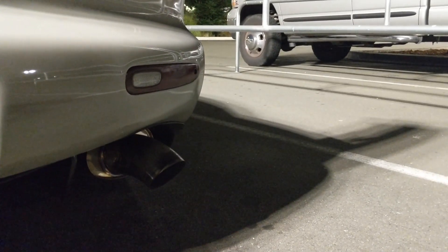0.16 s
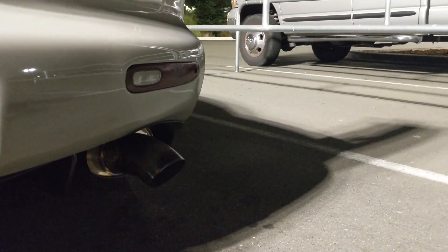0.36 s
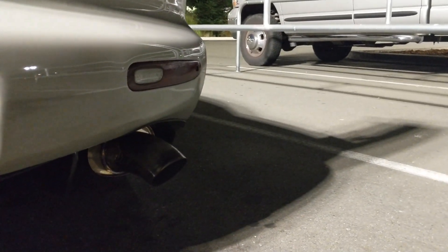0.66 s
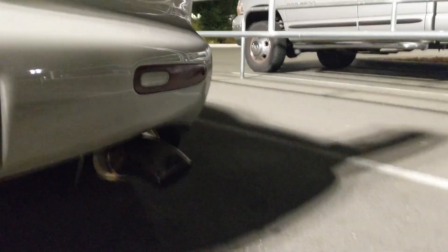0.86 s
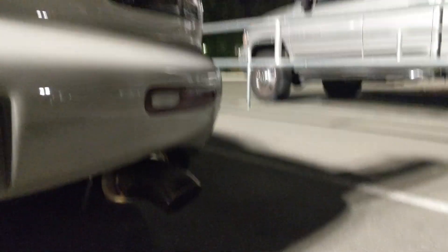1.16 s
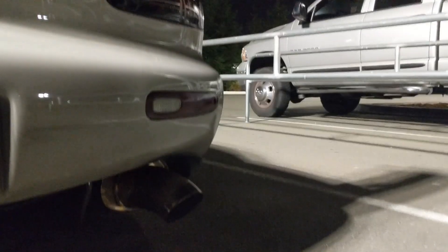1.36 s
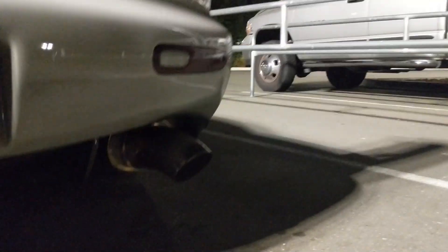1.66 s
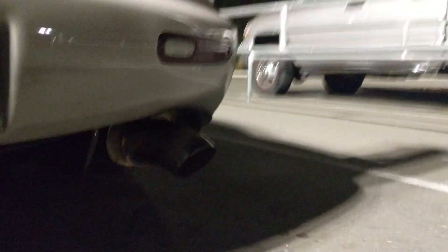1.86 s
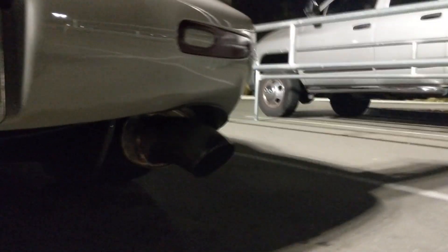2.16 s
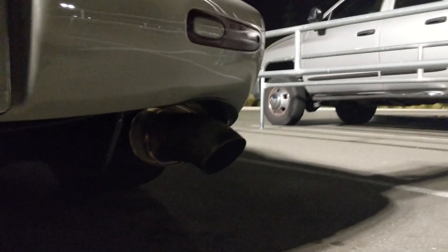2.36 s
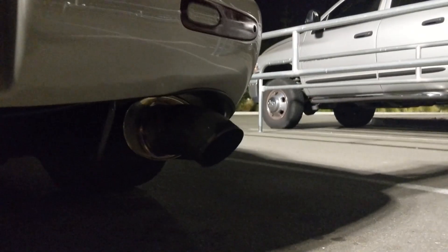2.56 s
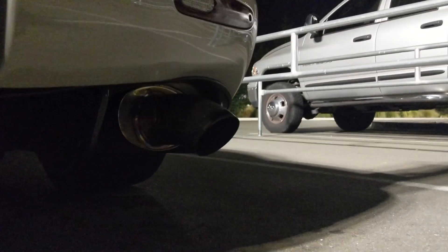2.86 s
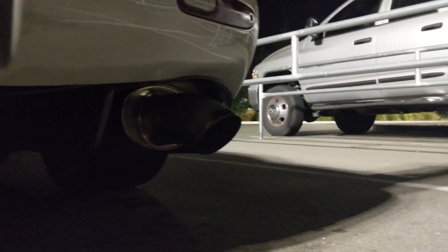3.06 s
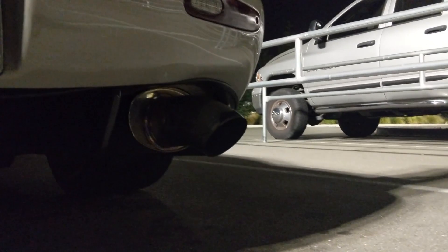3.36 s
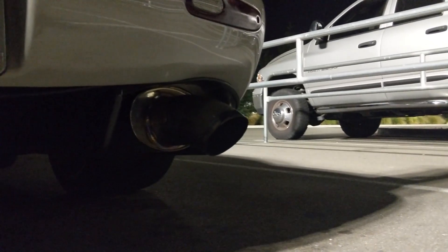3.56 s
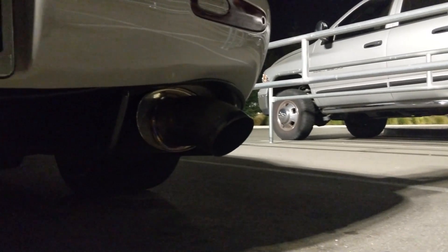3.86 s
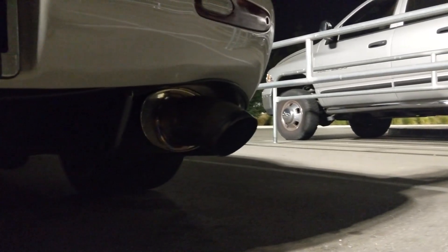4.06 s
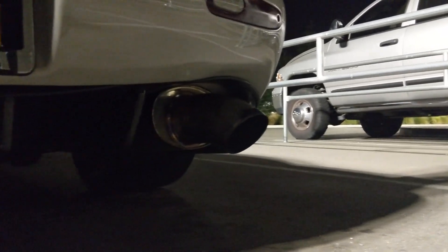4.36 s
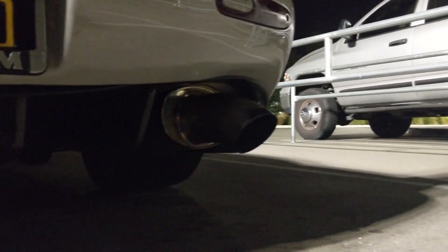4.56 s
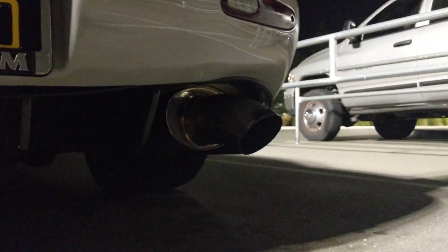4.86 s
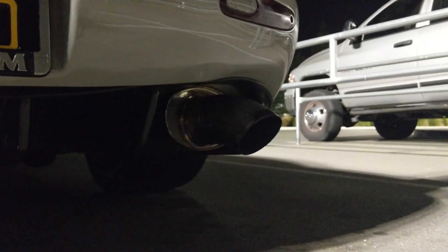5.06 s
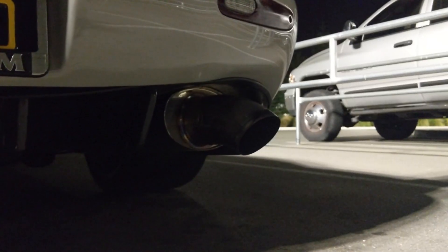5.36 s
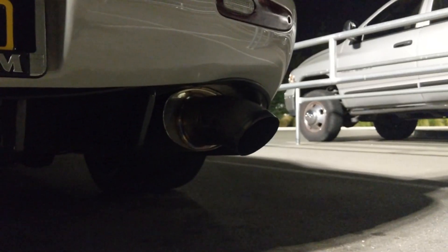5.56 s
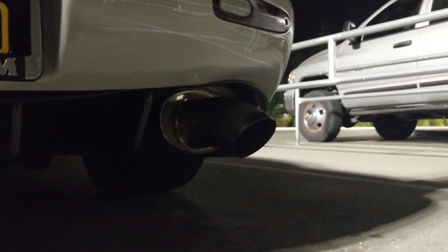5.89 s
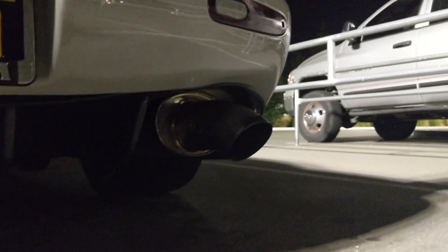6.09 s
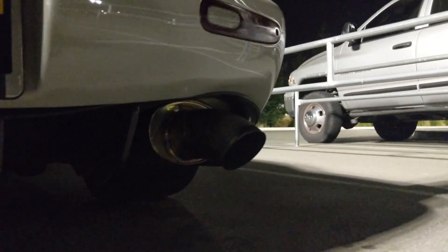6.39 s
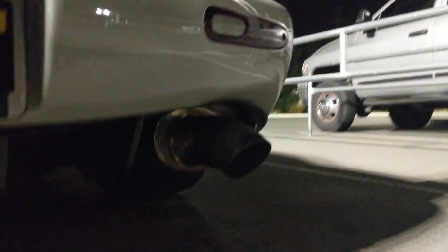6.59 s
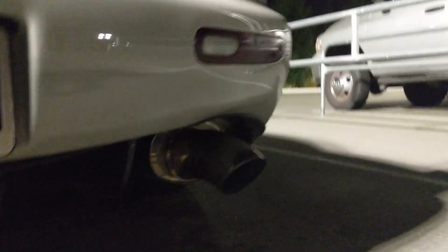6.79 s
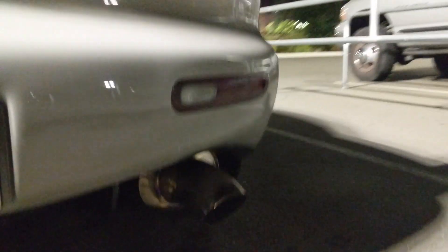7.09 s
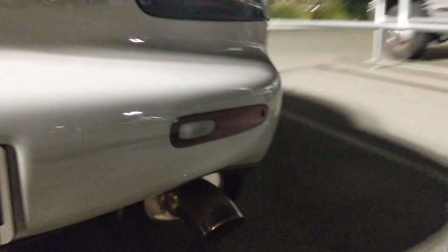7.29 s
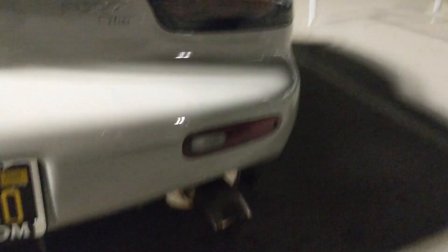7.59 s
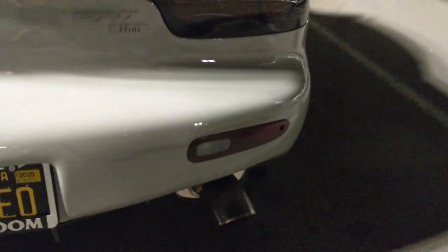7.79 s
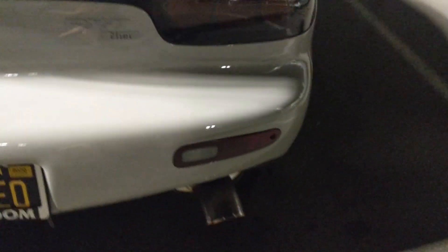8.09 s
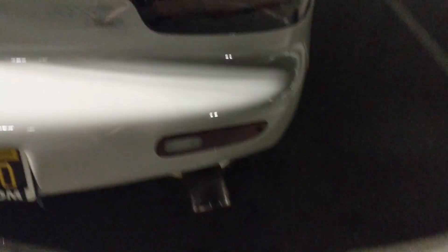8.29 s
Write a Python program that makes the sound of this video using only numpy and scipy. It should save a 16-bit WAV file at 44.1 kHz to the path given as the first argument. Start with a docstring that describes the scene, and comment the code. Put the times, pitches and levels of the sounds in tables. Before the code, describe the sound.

A two-rotor car engine idles with a loping, uneven chop, deep overloaded tailpipe thumps and breathy hissing spits, heard close up outdoors at night.

```python
"""A two-rotor engine idles with a lope, heard at its tailpipe in an open lot at night.
The rotors take turns: one fires a few shaft turns running, then misfires while the other fires.
Each firing rings the exhaust's modes as a thump and blows bursts of noise, rasp and spit, out of the tip.
A run's first firing sets noise whistling in the tip resonances, over a steady hiss of gas and turbo.
The handheld microphone moves in and away; its gain control and overload dull the loudest thumps."""
import sys
import numpy as np
from scipy import signal
from scipy.fft import rfft, irfft
from scipy.io import wavfile

SR = 44100
rng = np.random.default_rng(int(sys.argv[2]) if len(sys.argv) > 2 else 0)


def output_pcm(signal):
    """Save a mono or channel-first signal as 16-bit PCM at the path in sys.argv[1].

    Samples are clipped to [-1, 1] before scaling.
    """
    pcm = np.clip(np.atleast_2d(signal).T, -1, 1) * 32767
    wavfile.write(sys.argv[1], SR, np.round(pcm).astype(np.int16))


N = 372204
LEAD = 4410   # samples played before the start so the pipe is already ringing

# Microphone path. Each row: time in seconds, nearness to the tip (0 to 1),
# alignment with the outlet (-1 to 1), height above the bumper (0 to 1).
MIC_PATH = [(0, 0.09, -0.22, 0), (.8, 0.04, -0.11, 0.1), (1.15, 0.09, -0.16, 0), (1.5, 0, 0.078, 0),
            (2.3, 0.75, 0.25, 0.05), (2.6, 1, 0.82, 0.16), (6.8, 1, 0.9, 0), (7.2, 0.39, 0.02, 0.1),
            (7.7, 0.07, -0.28, 0.2), (8.05, 0.11, -0.55, 0.4), (8.44, 0.7, -0.29, 0.8)]

# Half turns of the shaft, the rotors in turn: 1 fires, 0 misfires.
LOPE, SHORT, LONE = "101011010100", "10100", "1010100"
RHYTHM = SHORT + LOPE + LONE + 2 * LOPE + SHORT + LONE + 18 * LOPE + SHORT + 6 * LOPE + LONE + 7 * LOPE


def from_db(db):
    """Gain of a level in dB."""
    return 10 ** (np.asarray(db) / 20)


def rms_one(x):
    """Scale to rms 1."""
    return x / np.sqrt(np.mean(x ** 2) + 1e-20)


def wander(knots_per_s):
    """Random walk-free drift: normal knots of spread 1 joined by straight lines."""
    knots = rng.standard_normal(int(N / SR * knots_per_s) + 2)
    return np.interp(np.linspace(0, len(knots) - 1, N), np.arange(len(knots)), knots)


def coloured(spectrum):
    """Noise of rms 1 shaped by (Hz, relative dB) points, straight on a log frequency axis."""
    hz = np.fft.rfftfreq(N, 1 / SR) + 1   # 1 Hz up, to keep the log finite
    point_hz, point_db = np.transpose(spectrum)
    shape_db = np.interp(np.log(hz), np.log(point_hz), point_db, left=-90)
    return rms_one(irfft(rfft(rng.standard_normal(N)) * from_db(shape_db), N))


def clicks(times_s, sizes):
    """Click train that starts LEAD samples early."""
    at = np.round(np.asarray(times_s) * SR).astype(int) + LEAD
    inside = (at >= 0) & (at < N + LEAD)
    return np.bincount(at[inside], np.asarray(sizes)[inside], N + LEAD) + 1e-18


def puff(train, rise_s, fall_s):
    """Envelope that rises quickly after each click and dies away exponentially."""
    rise, fall = np.exp(-1 / (rise_s * SR)), np.exp(-1 / (fall_s * SR))
    return signal.lfilter([1 - rise], np.convolve([1, -rise], [1, -fall]), train)[LEAD:]


def ring(train, hz, t60_s):
    """Two-pole resonator: a unit click sets a decaying sine of height 1 ringing."""
    r, w = from_db(-60 / (t60_s * SR)), 2 * np.pi * hz / SR
    return signal.lfilter([0, np.sin(w)], [1, -2 * r * np.cos(w), r * r], train)


def soften(train, soft_hz):
    """The long pipe rounds the pressure pulse: second-order low-pass."""
    return signal.sosfilt(signal.butter(2, soft_hz, fs=SR, output="sos"), train)


def firings():
    """Times of firings, which open a run, their rotor, times of misfires; the shaft kicks and sags with them."""
    # Idle speed, hunting slowly. Each row: time in seconds, shaft speed in rpm before the kicks.
    idle_speed = [(0.0, 1546.5), (0.49, 1587.2), (0.99, 1580.7), (1.48, 1551.2), (1.98, 1596.4),
                  (2.47, 1570.7), (2.96, 1554.9), (3.46, 1562.2), (3.95, 1546.0), (4.45, 1529.3),
                  (4.94, 1557.1), (5.44, 1561.3), (5.93, 1551.3), (6.42, 1526.5), (6.92, 1571.6),
                  (7.41, 1567.8), (7.91, 1548.7), (8.4, 1573.5)]
    kick_rpm, kick_kept = 30, .9   # a firing adds, a misfire takes; share left a half turn later
    fires = np.array(list(RHYTHM)) == "1"
    at, now_s, swing_rpm = [], -.0436, 0
    for fire in fires:
        at.append(now_s)
        swing_rpm = swing_rpm * kick_kept + (kick_rpm if fire else -kick_rpm)
        rpm = np.interp(now_s, *np.transpose(idle_speed)) + swing_rpm
        now_s += 30 / rpm   # half a turn
    at = np.array(at)
    same_rotor_fired = np.r_[False, False, fires[:-2]]
    first = fires & ~same_rotor_fired
    return at[fires], first[fires], np.flatnonzero(fires) % 2, at[~fires]


def steady_hiss(hiss_db):
    """Steady turbulent hiss of gas and turbo."""
    # Each row: frequency in Hz, relative level in dB per Hz.
    hiss_spectrum = [(500, 4), (800, -4.5), (1320, -8.5), (1830, -12.5), (3190, -19.5), (4000, -33),
                     (5290, -19), (7600, -19), (11000, -26.5), (13000, -43), (16000, -25)]
    return from_db(hiss_db - 3.0) * coloured(hiss_spectrum)


def burst_levels(fired, crowded_db):
    """Relative level of each firing's gas burst in dB."""
    crowded_s = .03   # this close behind the other rotor's firing, the tip is already blown clear
    db = np.where(np.diff(fired, prepend=-1) < crowded_s, crowded_db, 0.)
    db[np.argmin(abs(fired - 1.147))] += 10   # one firing bursts harder
    return db


def blast(fired, spectrum, delay_s, fall_s, spread_db, crowded_db):
    """A short burst of turbulent gas with each firing, each of its own size."""
    sizes = from_db(burst_levels(fired, crowded_db) + rng.normal(0, spread_db, len(fired)))
    return puff(clicks(fired + delay_s, sizes), rise_s=0.0014, fall_s=fall_s) * coloured(spectrum)


def spit(fired, hiss_db):
    """Bright turbulent burst out of the tip with each firing."""
    # Each row: frequency in Hz, relative level in dB per Hz.
    spit_spectrum = [(2500, -7), (4000, -1), (5300, -5.5), (7600, 0.5), (11000, -0.5), (13000, -9.5),
                     (16000, -7)]
    bursts = blast(fired, spit_spectrum, delay_s=0.0023, fall_s=0.008, spread_db=3.0, crowded_db=-2.0)
    return from_db(hiss_db + 5) * bursts


def rasp(fired, rasp_db):
    """Lower, shorter turbulent burst with each firing."""
    # Each row: frequency in Hz, relative level in dB per Hz.
    rasp_spectrum = [(450, -33), (600, -9.5), (900, -15), (1500, -22), (2500, -27), (4000, -39),
                     (6000, -47.5)]
    bursts = blast(fired, rasp_spectrum, delay_s=0.004, fall_s=0.0051, spread_db=2.0, crowded_db=-4)
    return from_db(rasp_db + 15.0) * bursts


def blow_levels(opened, rotor):
    """Jet level of each run in dB: by direction, rotor and chance, or its flare."""
    # Loudest jet flares. Each row: time in seconds, jet level in dB before each resonance's own.
    flares = [(.647, -40), (1.801, -37), (2.123, -43), (2.713, -36), (2.944, -36), (3.041, -35),
              (3.176, -37), (3.405, -33.5), (3.502, -44), (3.638, -37), (5.035, -32.5), (5.463, -34.5),
              (6.16, -36), (6.393, -33.5), (6.629, -33)]
    aside_db, in_line_gain_db, second_rotor_db, spread_db = -50, 13.5, -6.5, 3
    mic = np.array(MIC_PATH)
    in_line = np.interp(opened, mic[:, 0], mic[:, 2])
    db = aside_db + in_line_gain_db * in_line + second_rotor_db * rotor
    db = db + rng.normal(0, spread_db, len(db))
    for s, flare_db in flares:
        db[np.argmin(abs(opened - s))] = flare_db
    return db


def jet(opened, blow_db, hiss_db):
    """Gas whistles in the tip, loudest when a run's first firing burns the fuel left by the misfires."""
    # Each row: frequency in Hz, width in Hz, level in the jet in dB, fall in seconds,
    # steady whistle in dB against the hiss base level.
    tip_resonances = [(4070, 780, -22, 0.041, -12.5), (7480, 580, -4, 0.049, -21),
                      (8270, 1800, -3, 0.014, -31), (10100, 5400, -31, 0.0036, -12.5)]
    white, out = rng.standard_normal(N), 0
    blows = clicks(opened + 0.0026, from_db(blow_db))
    for hz, width_hz, level_db, fall_s, steady_db in tip_resonances:
        r = np.exp(-np.pi * width_hz / SR)
        poles = [1, -2 * r * np.cos(2 * np.pi * hz / SR), r * r]
        band = rms_one(signal.lfilter([1, 0, -1], poles, white))
        blown = from_db(level_db) * puff(blows, rise_s=0.0036, fall_s=fall_s)
        flow = blown + from_db(hiss_db + steady_db)
        out = out + from_db(2.7 * wander(22)) * flow * band   # each resonance swells on its own
    return out


def unburnt_puffs(missed):
    """Misfired charges leave late, weak and dull."""
    sizes = from_db(-11.5 + rng.normal(0, 3.85, len(missed)))
    return soften(soften(clicks(missed + 0.0035, sizes), soft_hz=328), soft_hz=162)


def thump(fired, strength, puffs, near, in_line, hollow_db):
    """Pulses ring every mode, the upper ones unevenly; those beam out of the tip, so follow direction."""
    # Exhaust modes. Each row: frequency in Hz, t60 in seconds, first swing heard from afar,
    # first swing near the tip (from 350 Hz up: in line with it); the sign is push or pull.
    exhaust_modes = [(64.3, .285, -.382, -.548), (80.5, .399, -.034, -.058), (96.5, .212, .18, .252),
                     (112, .118, .439, .64), (141.4, .066, .651, .799), (164.8, .137, .504, .572),
                     (188.7, .187, -.262, -.335), (198.6, .1, -.186, -.162), (226.1, .085, -.096, -.09),
                     (280.3, .047, -.136, .224), (309.5, .091, -.137, -.479), (331, .204, -.022, -.173),
                     (400, .05, -.05, -.08), (586.8, .06, .028, .2), (732.3, .06, .03, .17),
                     (856, .056, .025, -.12), (1300, .03, .02, .1)]
    # Space under the bumper, its level set by position. Each row: frequency in Hz, t60 in seconds.
    bumper_modes = [(445, 0.12), (472, 0.17)]
    modes = []
    for hz, t60_s, far, close in exhaust_modes:
        blend = near if hz < 350 else in_line
        modes.append((hz, t60_s, far + (close - far) * blend))
    modes += [(hz, t60_s, -from_db(hollow_db)) for hz, t60_s in bumper_modes]
    out, luck = 0, rng.standard_normal((len(fired), len(modes)))
    for k, (hz, t60_s, swing) in enumerate(modes):
        uneven_db = min(4.0, (hz / 380) ** 2) * luck[:, k]
        pulses = soften(clicks(fired, strength * from_db(uneven_db)), soft_hz=335) + puffs
        out = out + swing * ring(pulses, hz, t60_s)[LEAD:]
    return out


def scene():
    """Steady hiss, jet on each run's first firing, spit, rasp and thump on every firing."""
    mic_s, *columns = np.transpose(MIC_PATH)
    near, in_line, above = [np.interp(np.arange(N) / SR, mic_s, c) for c in columns]

    def heard_db(aside_db, in_line_db, above_db):
        """Base level: aside of the outlet, plus gains in line with it and above the bumper."""
        return aside_db + in_line_db * in_line + above_db * above

    thump_db, rasp_db = heard_db(0.062, 0.28, -.8), heard_db(-46, 4.05, 0.92)
    hiss_db, hollow_db = heard_db(-41.5, 3.74, -2.6), heard_db(-22.5, -0.72, -18)
    fired, first, rotor, missed = firings()
    # a run's first firing thumps weaker
    strength = from_db(np.where(first, -1.9, 0) + rng.normal(0, .3, len(fired)))
    pipe = from_db(thump_db) * thump(fired, strength, unburnt_puffs(missed), near, in_line, hollow_db)
    whistle = jet(fired[first], blow_levels(fired[first], rotor[first]), hiss_db)
    bursts = rasp(fired, rasp_db) + spit(fired, hiss_db)
    return (pipe + bursts + steady_hiss(hiss_db) + whistle)[None]


def record(dry):
    """The microphone drops deep bass, gain control leans back on loud peaks, peaks flatten, the top is cut."""
    x = signal.sosfilt(signal.butter(4, 57.6, "high", fs=SR, output="sos"), dry)
    over_db = np.maximum(20 * np.log10(np.abs(x) + 1e-9) + 2.3, 0)   # above -2.3 dB full scale
    release_db = 63.0 * np.arange(N) / SR   # 63 dB per s
    held_db = np.maximum.accumulate(over_db + release_db, axis=1) - release_db
    r = np.exp(-1 / (.002 * SR))   # 2 ms smoothing
    x = x * from_db(-.38 * signal.lfilter([1 - r], [1, -r], held_db))
    x = x / (1 + np.abs(x / .985) ** 30) ** (1 / 30)   # limits just below full scale
    return np.clip(signal.sosfilt(signal.cheby2(16, 60, 15850, fs=SR, output="sos"), x), -1, 1)


dry = scene()
out = record(dry)
output_pcm(out)
```